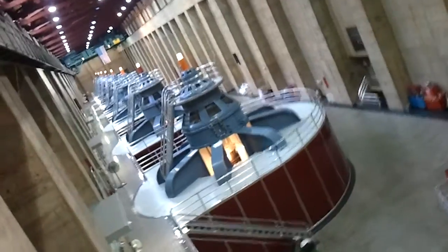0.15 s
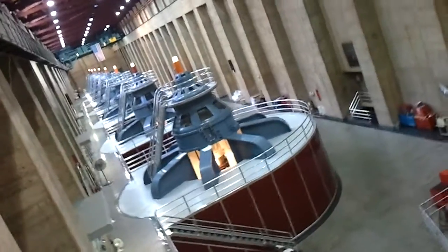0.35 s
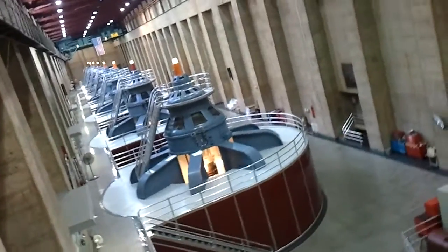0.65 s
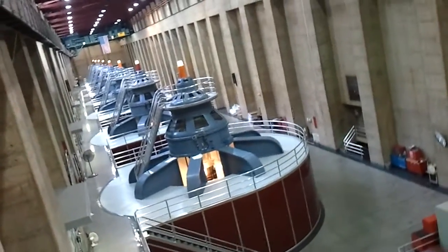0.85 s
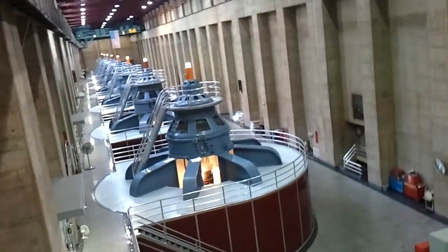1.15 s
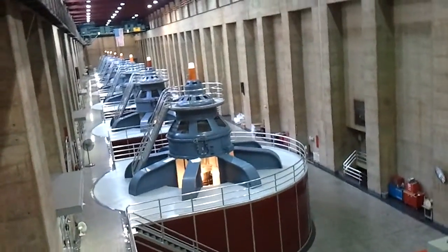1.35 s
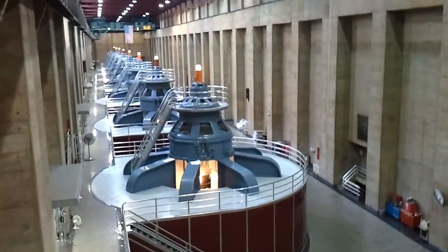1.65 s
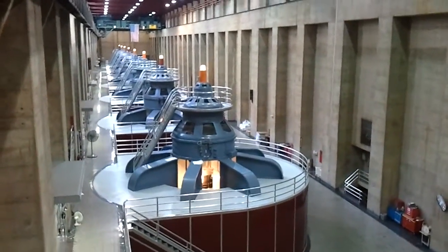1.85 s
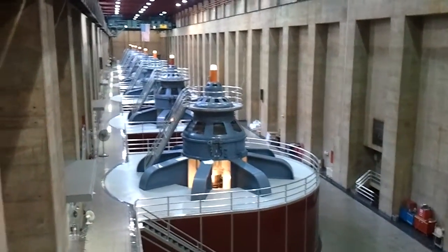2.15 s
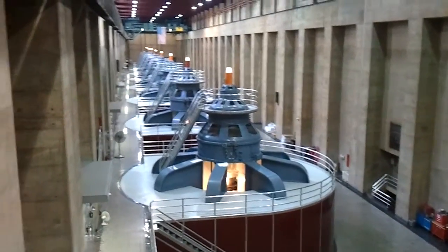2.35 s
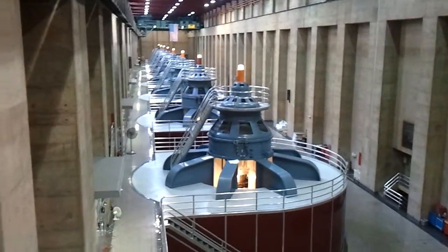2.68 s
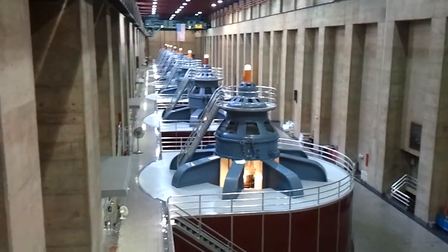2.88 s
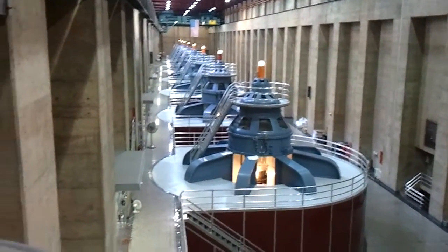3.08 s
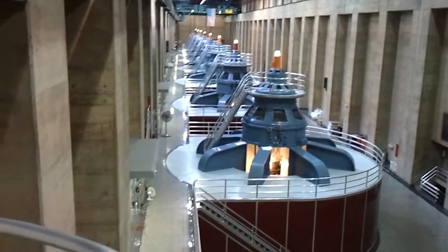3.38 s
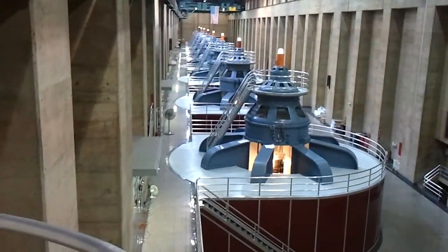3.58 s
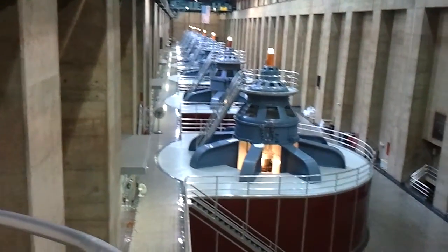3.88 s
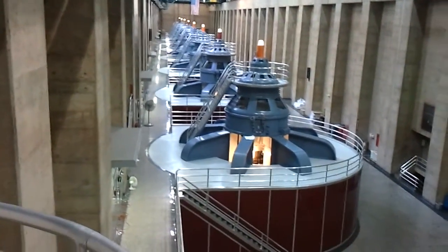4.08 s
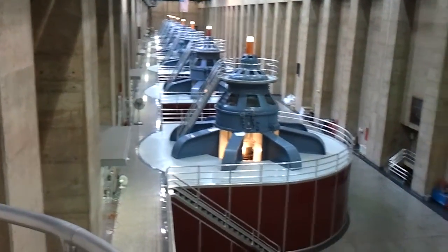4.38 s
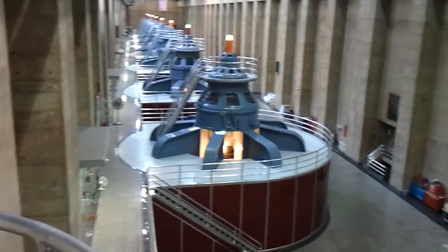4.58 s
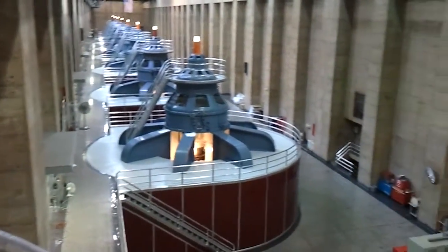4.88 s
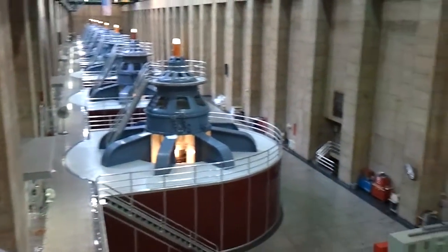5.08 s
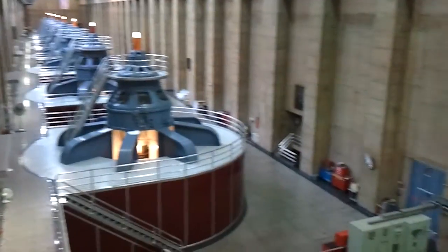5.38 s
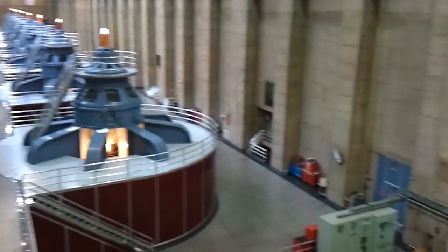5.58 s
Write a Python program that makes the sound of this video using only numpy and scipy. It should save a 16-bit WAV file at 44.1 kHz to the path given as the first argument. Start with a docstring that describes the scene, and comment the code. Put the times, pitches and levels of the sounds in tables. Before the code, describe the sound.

Large generators run in a concrete hall with a loud, steady roar of water and air, a low hum and a wavering whine.

```python
"""A long concrete hall with a row of hydroelectric generators, heard from a gallery above the nearest. Water
roars through the turbines and cooling air rushes through the rotors, both pulsing with the shaft. Mains hum and
low stator tones sound beneath, and the core whines above them. Wall reflections make each tone waver, and a
deep rumble fills the hall."""
import sys
import numpy as np
from scipy import signal
from scipy.fft import rfft, irfft, next_fast_len
from scipy.io import wavfile
from scipy.ndimage import uniform_filter1d

SR = 44100
rng = np.random.default_rng(int(sys.argv[2]) if len(sys.argv) > 2 else 0)


def generate_wav(signal):
    """Clip the signal to [-1, 1] and save it as 16-bit WAV at the path in sys.argv[1]."""
    frames = np.transpose(np.atleast_2d(signal))
    scaled = np.clip(frames, -1, 1) * 32767
    pcm = np.round(scaled).astype(np.int16)
    wavfile.write(sys.argv[1], SR, pcm)


N = 253134
TIME_S = np.arange(N) / SR
SHAFT_HZ = 2.9986


def turbine_water(chop, eddies):
    """Dull, churning roar of water in the turbines: slow surges under quick eddies."""
    # Each row: frequency in Hz, noise density in dB.
    spectrum = [(60, -44.5), (200, -20.5), (290, -7.5), (350, 0.5), (395, 1), (450, 0.7), (515, -0.4),
                (570, 1.5), (630, -1.5), (740, -6), (1000, -14), (2000, -32), (8000, -70.5)]
    # Each row: time in seconds, roar level in dB.
    levels = [(0, -14.5), (1.9, -15.5), (2.35, -15), (3.05, -13.5), (3.18, -17), (3.3, -14.5), (4.4, -15),
              (4.65, -15), (5.3, -15.5), (5.5, -16), (5.74, -14.5)]
    level_db = level_curve(levels) + 0.25 * drift(rate_hz=10)
    roar = from_db(level_db) * evened(coloured_noise(spectrum))
    return (roar + water_surges()) * from_db(0.88 * eddies) * (1 + chop)


def water_surges():
    """Brief swells in the water's churning roar, each a narrow band of noise rising and falling."""
    # Each row: crest time in seconds, level in dB, half-width in seconds, band centre in Hz.
    surges = [(0.09, -18, 0.041, 406), (0.93, -15, 0.053, 407), (1.336, -14.5, 0.049, 524),
              (1.47, -13, 0.027, 455), (1.707, -17, 0.032, 513), (2.179, -11.5, 0.044, 500),
              (2.412, -15, 0.029, 470), (2.674, -16, 0.065, 530), (2.795, -19.5, 0.035, 400),
              (2.99, -22, 0.07, 510), (3.337, -15.5, 0.068, 543), (3.945, -15.5, 0.036, 564),
              (4.03, -16, 0.08, 222), (4.2, -15, 0.064, 473), (4.801, -11.5, 0.048, 424),
              (5.0, -15.5, 0.032, 480), (5.146, -12, 0.039, 550)]
    half_band_hz = 100
    out = np.zeros(N)
    for crest_s, db, half_width_s, hz in surges:
        band = signal.butter(2, [hz - half_band_hz, hz + half_band_hz], "band", fs=SR, output="sos")
        churn = evened(signal.sosfilt(band, rng.standard_normal(N)))
        envelope = np.exp(-((TIME_S - crest_s) / half_width_s) ** 2)
        out += from_db(db) * envelope * churn
    return out


def cooling_air(chop, eddies):
    """Bright rush of air through rotors and coolers; the whole band flutters together."""
    # Each row: frequency in Hz, noise density in dB.
    spectrum = [(30, -44.5), (200, -25.5), (600, -5), (790, 2), (845, 4), (900, 3.5), (1000, 2.5),
                (1100, 0.7), (1500, 0.9), (1900, -3), (2300, -8.5), (3000, -10), (3700, -15), (4500, -17),
                (6100, -22.5), (7100, -31), (7550, -47), (8200, -71)]
    # Each row: time in seconds, rush level in dB.
    levels = [(0, -17), (0.7, -16.5), (0.8, -17), (0.96, -15.6), (1.2, -16.5), (1.75, -17), (2.05, -16),
              (2.55, -17), (2.8, -16.5), (3.3, -16.5), (3.9, -16.5), (4.3, -15.5), (4.7, -17.1),
              (5.1, -16.5), (5.74, -16.5)]
    vortices = drift(rate_hz=1100)   # millisecond bursts make the rush gritty
    flutter_db = 1.22 * eddies + 1.2 * vortices
    rush = evened(from_db(flutter_db) * coloured_noise(spectrum))
    return from_db(level_curve(levels)) * rush * (1 + chop)


def rotor_chop():
    """Pulsing of the flow: a swell each turn, a throb from the arms, a fine buzz from the poles."""
    # Each entry: beats per turn, modulation depth from 0 to 1.
    depths = {1: 0.02, 3: 0.019, 8: 0.035, 88: 0.069}
    first_crest_s = 0.008
    shaft_rad = 2 * np.pi * SHAFT_HZ * (TIME_S - first_crest_s)
    return sum(depth * np.cos(beats * shaft_rad) for beats, depth in depths.items())


def low_hum():
    """Low hum tones: mains hum near 60 and 120 Hz, and a close pair from stator and runner that beats once a
    turn."""
    # Each entry: multiple of the shaft speed, level in dB.
    tones = {20: -43.5, 40: -24.5, 47: -32, 48: -25}
    return sum(wavering_tone(order * SHAFT_HZ, db, crest_s=0.182, waver_db=1.0, waver_rad=0.18)
               for order, db in tones.items())


def core_whine():
    """Whine of the iron core; the strongest tones swell as the listener crosses their standing waves."""
    # Each entry: multiple of core_hz, level in dB.
    steady = {2: -39, 18: -40.5, 28: -42, 30: -43, 33: -42.5, 44: -47, 48: -45}
    # Each entry: multiple of core_hz, then rows of time in seconds, level in dB.
    standing_waves = { 10: [(0, -33.5), (0.8, -27.5), (1.6, -26.5), (2.2, -33.5), (4.2, -35.5), (5.1, -26),
                      (5.74, -27)], 12: [(0, -26.5), (0.9, -36), (2.0, -31.5), (3.1, -26.5), (3.8, -30.5),
                      (5.74, -33)], 14: [(0, -39), (0.6, -26), (1.1, -36), (3.1, -34.5), (4.4, -29),
                      (5.4, -49.5)], 15: [(0, -41), (0.9, -27.5), (1.8, -27.5), (2.4, -42), (3.2, -30),
                      (4.3, -31), (5.74, -32.5)]}
    core_hz = 39.98
    swelling = {order: level_curve(levels) for order, levels in standing_waves.items()}
    return sum(wavering_tone(order * core_hz, db, crest_s=rng.random(), waver_db=0.3, waver_rad=0.3)
               for order, db in {**steady, **swelling}.items())


def wavering_tone(hz, db, crest_s, waver_db, waver_rad):
    """One tone; wall reflections shift its level and phase as the listener moves."""
    waver_hz = 1.2
    phase_rad = 2 * np.pi * hz * (TIME_S - crest_s) + waver_rad * drift(waver_hz)
    return np.sqrt(2) * from_db(db + waver_db * drift(waver_hz)) * np.cos(phase_rad)


def hall_rumble(level_db):
    """Steady rumble: low sound rings longest between concrete walls, which evens out its flutter."""
    # Each row: frequency in Hz, noise density in dB.
    spectrum = [(20, -38), (42, -18.5), (68, -14.5), (88, -8), (104, -3.5), (170, -0.5), (250, 0.1),
                (330, -2), (500, -13.5), (1500, -66.5)]
    return from_db(level_db) * coloured_noise(spectrum)


def coloured_noise(spectrum):
    """Noise at rms 1, shaped by (Hz, dB) rows."""
    hz, db = np.transpose(spectrum)
    size = next_fast_len(N)
    bins_hz = np.maximum(np.fft.rfftfreq(size, 1 / SR), 1)
    gain = from_db(np.interp(np.log(bins_hz), np.log(hz), db))
    white = rfft(rng.standard_normal(size))
    return rms_one(irfft(white * gain, size)[:N])


def drift(rate_hz):
    """Smooth random curve at rms 1, changing about rate_hz times a second."""
    step, run_in = 40, 2000
    pole = np.exp(-2 * np.pi * step * rate_hz / SR)
    white = rng.standard_normal(N // step + run_in + 2)
    slow = signal.lfilter([1], [1, -2 * pole, pole * pole], white)[run_in:]
    return np.interp(np.arange(N) / step, np.arange(len(slow)), rms_one(slow))


def level_curve(levels):
    """Level in dB at each sample, from (seconds, dB) rows."""
    return np.interp(TIME_S, *np.transpose(levels))


def evened(x, window_s=0.22):
    """Hold the running rms at 1; the quick grain stays."""
    return x / np.sqrt(running_power(x, window_s))


def running_power(x, window_s):
    """Mean square over a sliding window."""
    return uniform_filter1d(x ** 2, int(window_s * SR)) + 1e-12


def rms_one(x):
    """Scale to rms 1."""
    return x / np.sqrt(np.mean(x ** 2) + 1e-20)


def from_db(db):
    """Decibels to gain."""
    return 10 ** (np.asarray(db) / 20)


def scene():
    """Water, air, hum, whine and rumble in mono; one shaft and the same eddies stir both flows."""
    chop, eddies = rotor_chop(), drift(rate_hz=81)
    flows = turbine_water(chop, eddies) + cooling_air(chop, eddies)
    return (flows + hall_rumble(level_db=-18.0) + low_hum() + core_whine())[None]


def record(dry):
    """Quick gain control steadies the level, a soft clip rounds the peaks, a low-pass cuts the top."""
    rest_db, swing_share = -10.5, 0.3
    ceiling, cutoff_hz = 0.97, 7650
    level_db = 10 * np.log10(running_power(dry, window_s=0.025))
    steadied = dry * from_db(swing_share * (rest_db - level_db))
    rounded = steadied / (1 + (steadied / ceiling) ** 8) ** (1 / 8)
    low_pass = signal.ellip(10, 0.05, 60, cutoff_hz, fs=SR, output="sos")
    return signal.sosfiltfilt(low_pass, rounded)


dry = scene()
out = record(dry)
generate_wav(out)
```